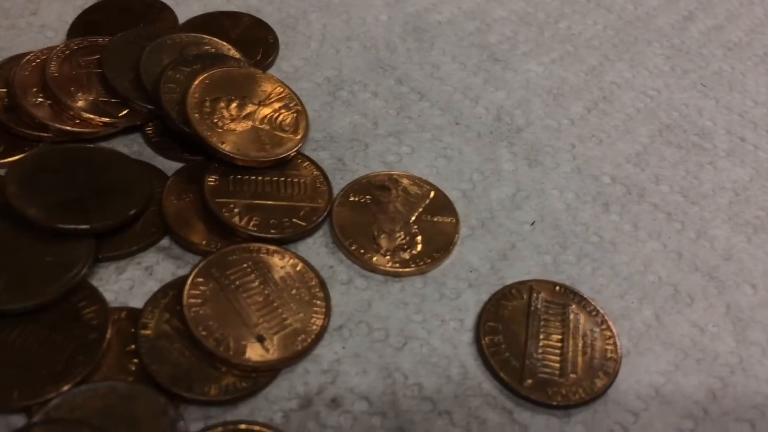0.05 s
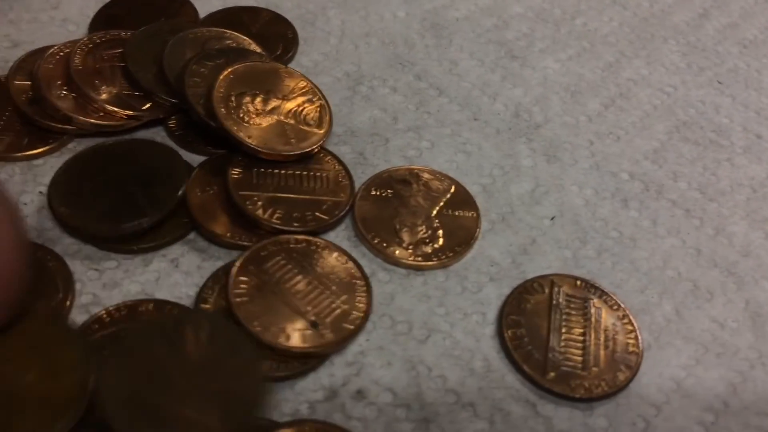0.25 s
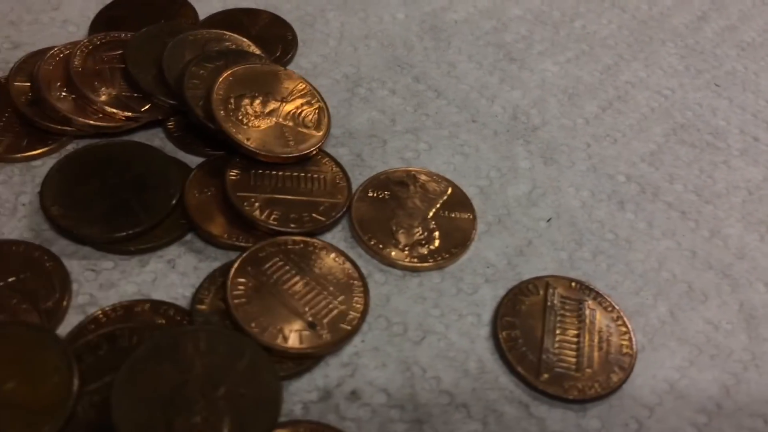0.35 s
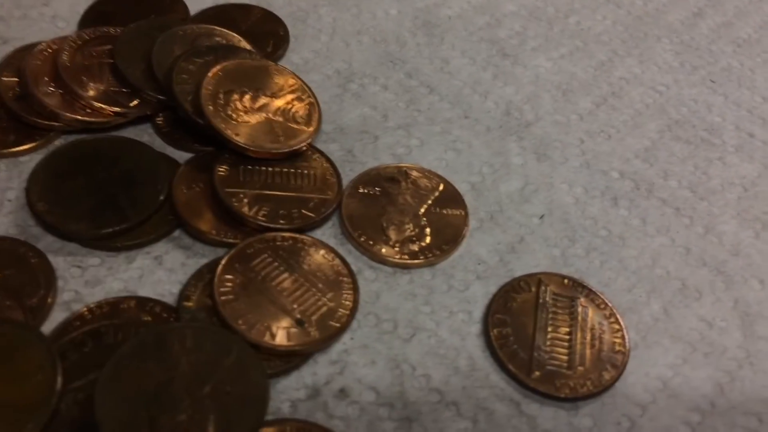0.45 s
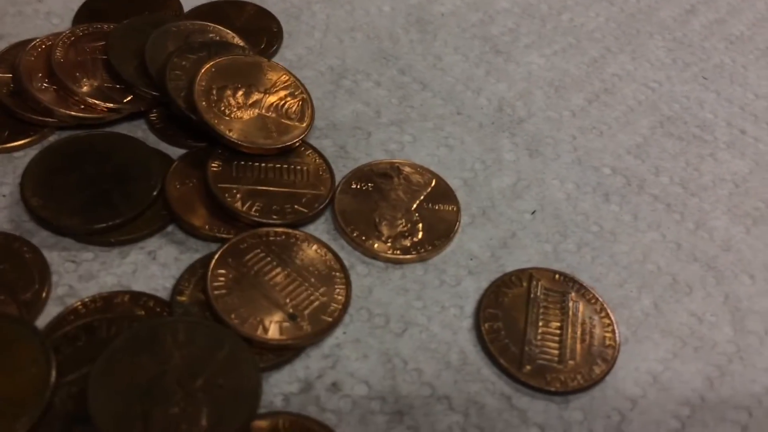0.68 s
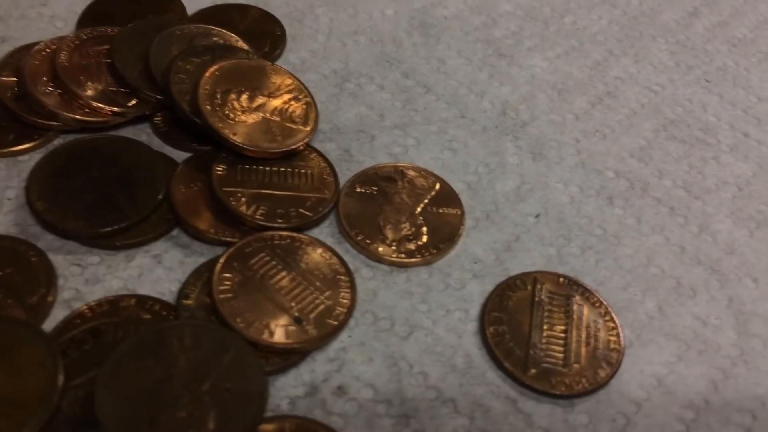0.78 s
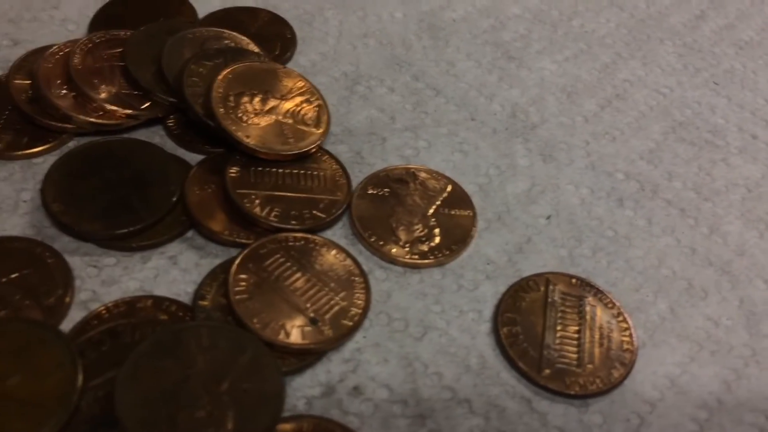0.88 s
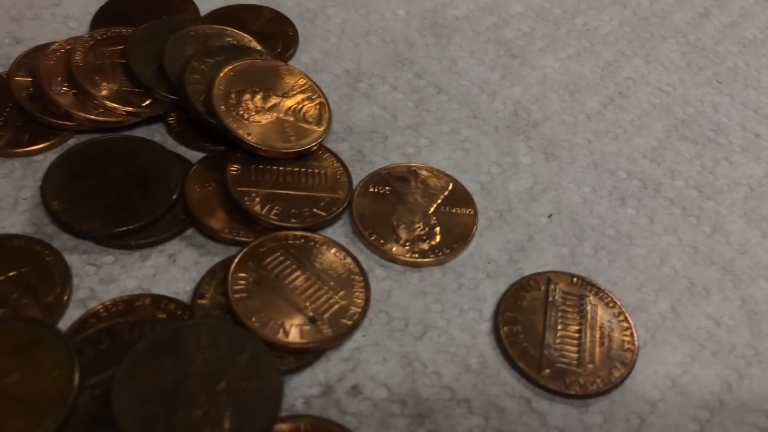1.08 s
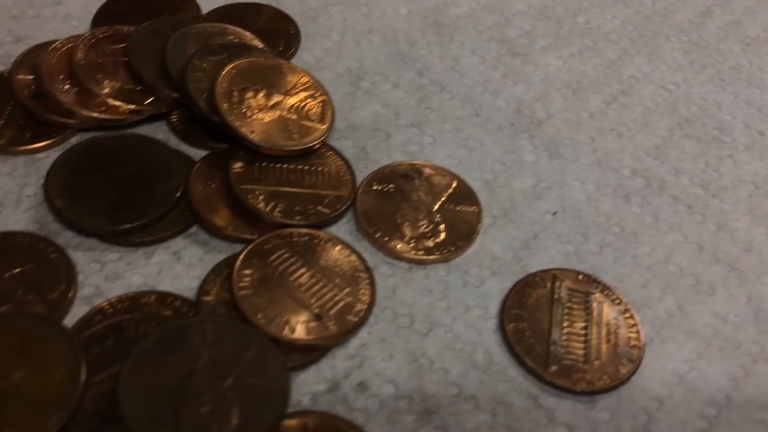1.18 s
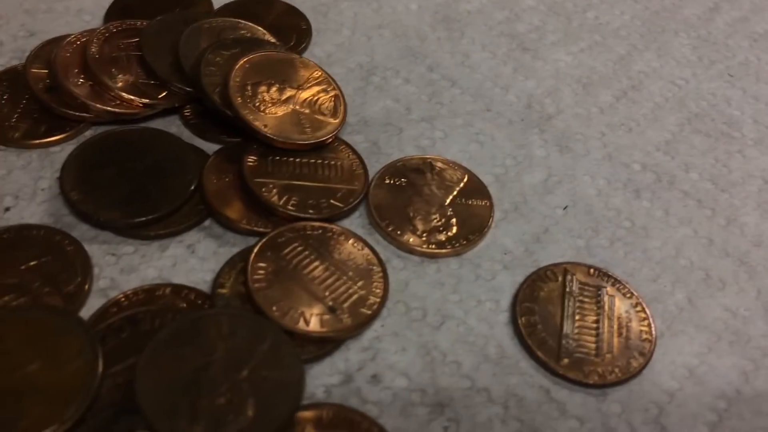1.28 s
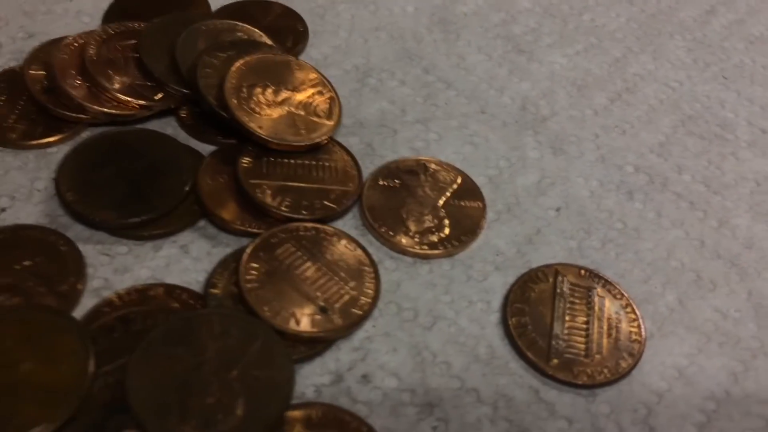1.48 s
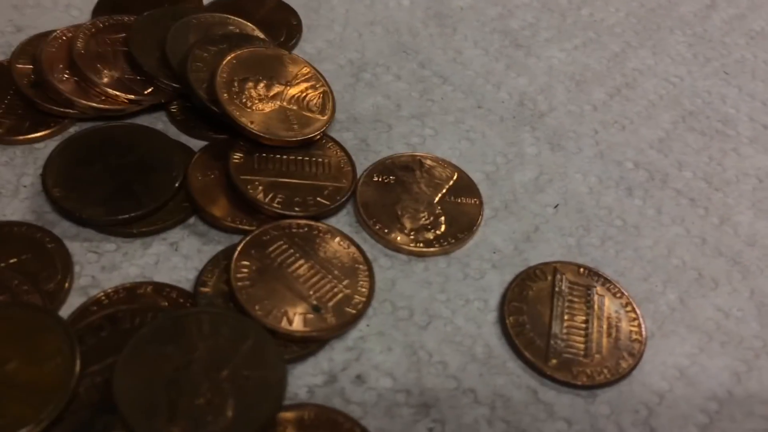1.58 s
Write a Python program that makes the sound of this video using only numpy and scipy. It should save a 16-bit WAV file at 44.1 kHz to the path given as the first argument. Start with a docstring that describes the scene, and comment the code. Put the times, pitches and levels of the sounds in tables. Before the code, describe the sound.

Coins drop on a coin pile three times, with bright clinks and dull table knocks.

```python
"""A paper-covered table in a small, quiet room, microphone close to a pile of copper coins. The room hums.
At 0.2 s coins land on the pile: hard ticks ring them near 13 kHz, the table knocks and thumps below,
and they settle with a gritty slide. At 0.8 s a second toss clacks on a stack and wobbles to rest.
At 1.3 s a third, lighter toss ticks, knocks and slides, and the room tone is left."""
import sys
import numpy as np
from scipy import signal
from scipy.fft import rfft, irfft, next_fast_len
from scipy.io import wavfile

SR = 44100
rng = np.random.default_rng(int(sys.argv[2]) if len(sys.argv) > 2 else 0)


def file_out(sig):
    """Save sig as 16-bit WAV at sys.argv[1]."""
    # one column per channel
    cols = np.atleast_2d(sig).T
    # limit, then scale
    lim = np.clip(cols, -1, 1)
    pcm = np.round(lim * 32767).astype(np.int16)
    wavfile.write(sys.argv[1], SR, pcm)


N = 72765
T = np.arange(N) / SR


def amp(db):
    """Decibels to gain."""
    return 10 ** (np.asarray(db) / 20)


def unit(x):
    """Scale to rms 1."""
    return x / np.sqrt(np.mean(x ** 2))


def fade(t60):
    """Exponential decay, a third of a second long."""
    return np.exp(-np.log(1000) * T[:SR // 3] / max(t60, 1e-4))


def mode(hz, t60):
    """One decaying sine that starts at rms 1."""
    return np.sqrt(2) * np.sin(2 * np.pi * hz * T[:SR // 3]) * fade(t60)


def add(out, at, x):
    """Mix x into out from a time in seconds."""
    start = int(at * SR)
    out[start:start + len(x)] += x[:N - start]


def dull(x, hz):
    """Gentle low-pass."""
    return signal.sosfilt(signal.butter(2, hz, fs=SR, output="sos"), x)


def colour(x, points):
    """Causal filter through (f/Hz, level/dB) points that keeps the power of white noise."""
    size = 2 * next_fast_len(N)
    hz, db = np.array(points).T
    bin_hz = np.arange(size // 2 + 1) * SR / size
    gain = unit(amp(np.interp(np.log(bin_hz + 1), np.log(hz), db)))
    cepstrum = irfft(np.log(gain))
    cepstrum[1:size // 2] *= 2  # folded for minimum phase
    cepstrum[size // 2 + 1:] = 0
    return irfft(rfft(x, size) * np.exp(rfft(cepstrum)))[:N]


def curve(rows, column):
    """Gain over time from one dB column of a table, silent outside it."""
    rows = np.array(rows)
    return amp(np.interp(T, rows[:, 0], rows[:, column], left=-np.inf, right=-np.inf))


def contact(t60, tail_t60, tail_db, blow_db):
    """A sharp first blow, then a rattle of micro-bounces with a weaker, longer tail."""
    envelope = fade(t60) + amp(tail_db) * fade(tail_t60)
    rattle = envelope * rng.standard_normal(len(envelope))
    rattle *= np.linalg.norm(envelope) / np.linalg.norm(rattle)
    rattle[0] -= amp(blow_db) * np.linalg.norm(rattle)
    return rattle


def grit(grains_per_s=1800, spread_db=2.5, grain_t60=0.0065):
    """Dense tiny contacts of uneven size, rms 1."""
    hits = rng.random(N) < grains_per_s / SR
    sizes = amp(spread_db * np.minimum(rng.exponential(size=N), 4))
    power = np.abs(signal.fftconvolve((hits * sizes) ** 2, fade(grain_t60) ** 2)[:N])
    return unit(np.sqrt(power) * rng.standard_normal(N))


def chatter(ring, swell_s=0.00024):
    """A ring struck again by tiny rebounds that swell and die within milliseconds; same energy."""
    age = T[:SR // 50] / swell_s
    rebounds = age * np.exp(-age) * rng.standard_normal(len(age))
    out = signal.fftconvolve(ring, rebounds)[:len(ring)]
    return out * np.linalg.norm(ring) / np.linalg.norm(out)


# spectrum of the room's rumble: f/Hz, relative level/dB
ROOM_SPECTRUM = [(25, -23.5), (45, -19), (95, -5), (142, -8), (200, -17), (335, -18.5), (480, -24.5),
                 (1600, -37.5), (3440, -48), (15000, -61)]
# steady tones in the room: f/Hz, level/dB
HUM_TONES = [(91.5, -55), (1717, -73)]


def room_tone():
    """Low rumble and a faint steady hum from the room behind the table."""
    hum = sum(amp(db) * np.sqrt(2) * np.sin(2 * np.pi * (hz * T + rng.random())) for hz, db in HUM_TONES)
    rumble = unit(colour(rng.standard_normal(N), ROOM_SPECTRUM))
    return amp(-43.5) * rumble + hum


# the weight of a landing on the whole table top: t/s, level/dB
TABLE_THUMPS = [(0.213, -27.5), (.819, -23), (0.911, -32)]


def thumps(hz=142.5, t60=0.08):
    """The lowest mode of the table top, pushed softly."""
    out = np.zeros(N)
    soft_onset = 1 - fade(t60 / 10)
    for at, db in TABLE_THUMPS:
        add(out, at, amp(db) * mode(hz, t60) * soft_onset)
    return out


# resonances of the table top: f/Hz, relative level/dB, t60/s
TABLE_RESONANCES = [(414.6, -16, 0.09), (626, -24, 0.14), (817, -16.5, 0.045), (1434, -11, 0.04),
                    (1614, -11.5, 0.041), (1830, -17, 0.029), (2705, -19, 0.034)]
# clack of a stack of coins: f/Hz, relative level/dB
STACK_RESONANCES = [(883, -17.5), (1090, -21), (1250, -18), (1560, -27), (1720, -14), (2150, -25),
                    (2380, -22), (2710, -20), (3040, -19.5), (3460, -23.5), (3840, -24.5)]


def landing_bodies(stack_t60=0.055, through_stack_db=-5.5):
    """The ring of the struck table, and of a struck stack with the table ringing under it."""
    table = sum(amp(db) * mode(hz, t60) for hz, db, t60 in TABLE_RESONANCES)
    stack = sum(amp(db) * mode(hz, stack_t60) * rng.choice([-1, 1]) for hz, db in STACK_RESONANCES)
    return {"table": table, "stack": stack + amp(through_stack_db) * table}


# what each toss lands on: "table" or "stack"
LANDS_ON = ["table", "stack", "table"]
# spectrum of contact noise through the table: f/Hz, relative level/dB
TABLE_SPECTRUM = [(80, -10), (200, 1.5), (400, -4.5), (800, 3), (1150, -8), (1550, -3), (2700, -3.5),
                  (4500, -7), (9000, -26)]
# the pile knocks on the table, one list per toss: t/s, level/dB, low-pass f/Hz
PILE_KNOCKS = [
    [(0.229, -27, 3040), (0.243, -26.5, 2520), (.262, -35.5, 2000), (0.2735, -42, 1970),
     (0.2858, -30, 2470), (.388, -43, 2520)],
    [(0.8132, -25, 7940), (0.8163, -16, 7900), (0.8275, -16.5, 1200), (0.9175, -29.5, 1477),
     (1.0036, -38, 1787)],
    [(1.3375, -39, 8000), (1.3767, -21, 4600), (1.4375, -55, 6000)],
]


def knocks_and_rumble(rumble_noise_db=-2.5, rumble_ring_db=-2):
    """Heavier landings knock and slides rumble; both ring what the toss lands on."""
    bodies = landing_bodies()
    out = np.zeros(N)
    for landing, knocks, slide in zip(LANDS_ON, PILE_KNOCKS, COIN_SLIDES):
        body = bodies[landing]
        rub = curve(slide, column=2) * grit()
        out += amp(rumble_noise_db) * colour(rub, TABLE_SPECTRUM)
        out += amp(rumble_ring_db) * signal.fftconvolve(rub, body / np.linalg.norm(body))[:N]
        for at, db, dull_hz in knocks:
            rattle = contact(t60=0.006, tail_t60=0.079, tail_db=-13, blow_db=3)
            knock = colour(rattle, TABLE_SPECTRUM)[:len(body)] / np.sqrt(2) + body
            add(out, at, amp(db) * dull(knock, dull_hz))
    return out


# coins slide and settle, one list per toss: t/s, scrape level/dB, level/dB driving the rumble above
COIN_SLIDES = [
    [(.214, -42.5, -47.5), (.245, -24, -29), (.265, -25.5, -31.5), (.298, -28, -42), (.322, -41.5, -78),
     (.355, -44.5, -57), (.368, -70, -78)],
    [(.792, -55.5, -81), (.811, -41.5, -39), (.822, -22, -30.5), (.848, -42, -36), (.873, -31, -45.5),
     (.897, -38.5, -55), (.96, -42.5, -57.5), (.995, -52.5, -83), (1.04, -74, -71)],
    [(1.329, -49.5, -53.5), (1.35, -42, -43.5), (1.367, -41, -36), (1.385, -32, -33), (1.408, -52, -60),
     (1.438, -50, -67), (1.452, -72, -65)],
]
# spectrum of a scrape: f/Hz, relative level/dB
SCRAPE_SPECTRUM = [(500, -27), (2000, -25.5), (4000, -6), (5300, 2), (7400, 8.5), (9000, 6.5), (11500, 2),
                   (15000, -1.5)]
# coins wobble to rest after the second toss: t/s, level/dB
COIN_WOBBLE = [(.897, -38), (.915, -29), (.93, -41.5), (.955, -32.5), (.99, -43), (1.04, -82)]
# lowest bending modes of the sliding and wobbling coins: f/Hz, relative level/dB
BENDING_MODES = [(12620, 3.5), (12780, -3), (13070, -2), (13300, 1)]


def scrapes(ring_t60=0.042, slide_ring_db=-6.5):
    """Rims grind over embossed faces; a wobbling coin is struck again and again, so its ring is rough."""
    coins = sum(amp(db) * mode(hz, ring_t60) for hz, db in BENDING_MODES)
    rough_ring = unit(signal.fftconvolve(grit(), coins)[:N])
    sliding = sum(curve(slide, column=1) for slide in COIN_SLIDES)
    ring_gain = amp(slide_ring_db) * sliding + curve(COIN_WOBBLE, column=1)
    return sliding * colour(grit(), SCRAPE_SPECTRUM) + ring_gain * rough_ring


# coin strikes coin: t/s, tick level/dB, tick t60/s, ring level/dB, ring f/Hz
COIN_STRIKES = [(0.215, -25, 0.0063, -26, 13700), (0.232, -28, 0.0054, -22, 13200),
                (0.241, -21, 0.0024, -29, 13100), (0.2468, -25, .005, -26, 14900),
                (0.2504, -24.5, 0.0044, -25, 14700), (0.2562, -26, 0.0066, -14, 13000),
                (0.2621, -16.5, 0.0088, -17.5, 13100), (0.273, -20, .005, -25, 14500),
                (0.276, -17.5, 0.003, -29.5, 13220), (0.2851, -16.5, 0.009, -14.5, 13240),
                (0.2892, -18.5, 0.0029, -19, 12700), (0.2956, -18.5, .012, -14, 12940),
                (0.3031, -27, .004, -22, 12800), (0.313, -26, .005, -22, 13000),
                (0.344, -32, .004, -43, 13800), (.356, -35, 0.0079, -49, 13500),
                (0.3853, -38, 0.015, -32, 13000), (0.3895, -28, 0.012, -21, 13160),
                (0.4185, -38, .006, -54, 15000), (0.4987, -48.5, 0.0041, -67, 13030),
                (0.8134, -11, 0.0015, -25.5, 12870), (0.8212, -31.5, .006, -35.5, 13200),
                (.83, -17, 0.0086, -29, 13100), (0.832, -11.5, 0.004, -30.5, 13200),
                (0.8408, -22, 0.002, -29, 13000), (0.8519, -24, .003, -34.5, 13000),
                (0.8988, -32, .003, -20.5, 12800), (0.908, -26.5, .012, -15, 13030),
                (0.9126, -26.5, 0.0074, -14, 13070), (0.957, -33.5, 0.019, -34, 13280),
                (1.3362, -23.5, 0.0057, -21.5, 13500), (1.3385, -18.5, 0.003, -31.5, 13700),
                (1.3512, -26, 0.0036, -45.5, 13200), (1.361, -22.5, 0.012, -32.5, 13450),
                (1.387, -20, 0.005, -26.5, 13000), (1.3887, -26.5, .005, -25.5, 12700),
                (1.423, -30, 0.0083, -28.5, 13070), (1.437, -37, 0.0086, -35, 13100)]
# spectrum of a tick: f/Hz, relative level/dB
TICK_SPECTRUM = [(500, -26), (2000, -22.5), (3500, -8), (5200, -3), (7400, 4.5), (9000, 2.5), (11500, 2.5),
                 (15000, -0.5)]
# a coin comes free and rings on at one pitch: t/s, f/Hz, level/dB, t60/s
FREE_COINS = [(.256, 13200, -25, .05), (.305, 13120, -31, .05), (.39, 13190, -37, .11),
              (1.339, 13100, -24, .03)]


def clinks(ring_t60=0.031, spread_hz=200):
    """Each strike ticks and rings six touching coins of nearly equal pitch; the pile damps them fast."""
    ticks, rings = np.zeros(N), np.zeros(N)
    for at, tick_db, tick_t60, ring_db, ring_hz in COIN_STRIKES:
        add(ticks, at, amp(tick_db) * contact(tick_t60, tail_t60=0.025, tail_db=-4, blow_db=-15))
        coins = rng.standard_normal(size=(6, 2))
        ring = chatter(sum(share * mode(ring_hz + spread_hz * detune, ring_t60)
                           for share, detune in coins))
        ring *= np.linalg.norm(fade(ring_t60)) / np.linalg.norm(ring)  # the energy of a single mode
        add(rings, at, amp(ring_db) * ring)
    for at, hz, db, t60 in FREE_COINS:
        add(rings, at, amp(db) * mode(hz, t60))
    return colour(ticks, TICK_SPECTRUM) + rings


def scene(echo_t60=0.35, echo_db=-21, echo_delay_s=0.004):
    """One microphone: coins and table up close, a short dull echo from the walls, room tone behind."""
    direct = clinks() + scrapes() + knocks_and_rumble() + thumps()
    walls = fade(echo_t60) * rng.standard_normal(SR // 3) * (T[:SR // 3] > echo_delay_s)
    echo = signal.fftconvolve(direct, walls / np.linalg.norm(walls))[:N]
    return (direct + amp(echo_db) * dull(echo, hz=6950) + room_tone())[None]


def record(dry):
    """The recorder cuts the top steeply above 15.4 kHz."""
    return signal.sosfilt(signal.ellip(10, 0.2, 70, 15400, fs=SR, output="sos"), dry)


dry = scene()
out = record(dry)
file_out(out)
```